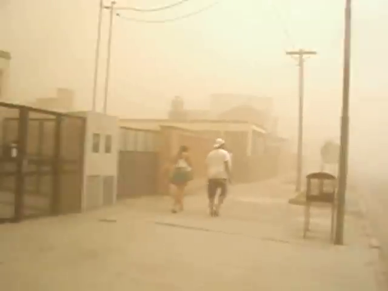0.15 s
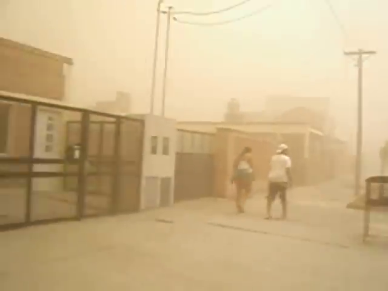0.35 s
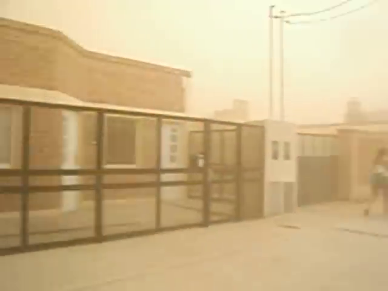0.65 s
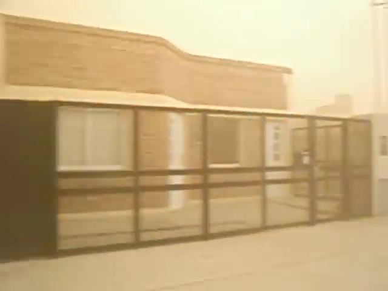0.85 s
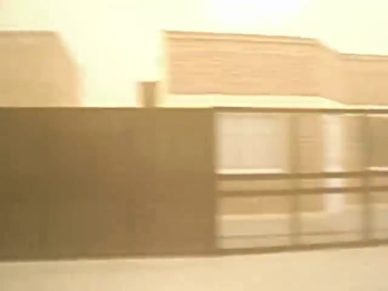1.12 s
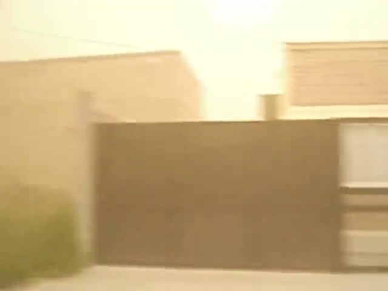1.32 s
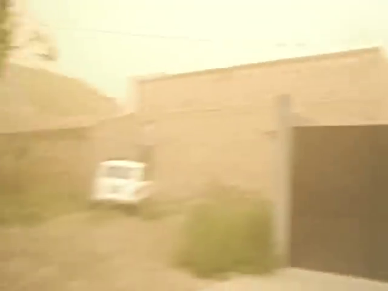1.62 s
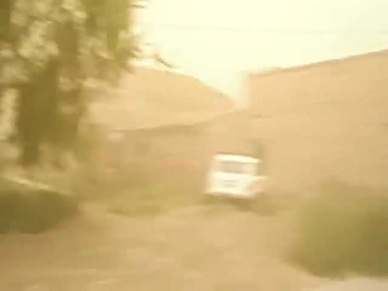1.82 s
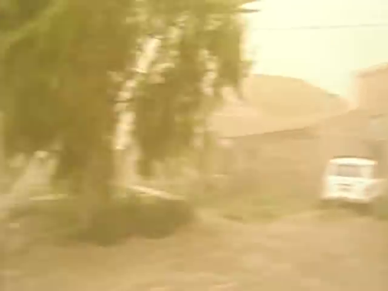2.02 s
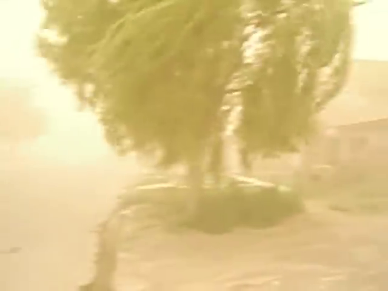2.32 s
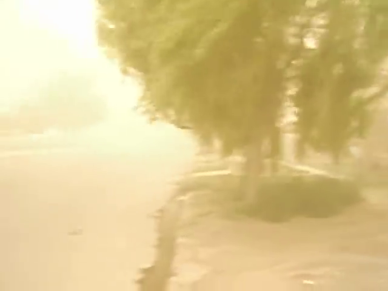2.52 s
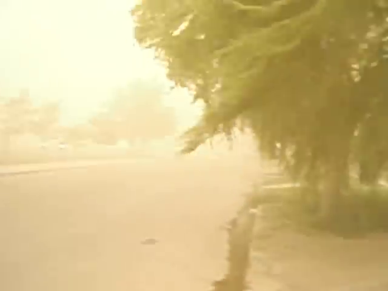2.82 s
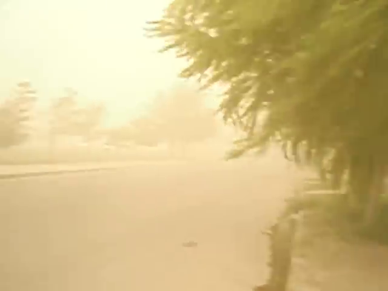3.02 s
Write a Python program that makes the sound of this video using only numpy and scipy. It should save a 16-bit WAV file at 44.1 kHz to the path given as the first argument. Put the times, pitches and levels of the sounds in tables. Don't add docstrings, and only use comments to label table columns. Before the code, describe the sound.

Gusty wind strikes a bare, cheap microphone in an open street. From 0.1 s irregular low thumps and flutters build to a heavy blow around 0.6 s, then weaken until a near-lull around 1.2-1.35 s. Harsh, clipping, ripping roar fills 1.4-1.8 s. Broken flutters follow, surging again at 2.2-2.8 s, then soft dull puffs over faint, steady wind hiss. Dull, narrow-band, mono.

```python
import sys
import numpy as np
from scipy import signal
from scipy.fft import rfft, irfft
from scipy.io import wavfile
from scipy.ndimage import uniform_filter1d

SR = 44100
rng = np.random.default_rng(int(sys.argv[2]) if len(sys.argv) > 2 else 0)


def output_pcm(signal):
    pcm = np.clip(np.atleast_2d(signal).T, -1, 1) * 32767
    wavfile.write(sys.argv[1], SR, np.round(pcm).astype(np.int16))


def gain_from_db(level_db):
    decades = np.asarray(level_db, float) / 20
    return 10 ** decades


N = 138915


def unit(x):
    return x / np.sqrt(np.mean(x ** 2))


def flicker(rate_hz):
    hold = int(SR / rate_hz)
    levels = rng.standard_normal(N)[:N // hold + 1]
    stairs = np.repeat(levels, hold)
    ramps = uniform_filter1d(uniform_filter1d(stairs, hold), hold)
    return unit(ramps[:N])


def pressure_band(centre_hz, width_hz):
    noise = rng.standard_normal(N)
    b, a = signal.iirpeak(centre_hz, centre_hz / width_hz, fs=SR)
    for _ in range(3):
        noise = signal.lfilter(b, a, noise)
    return unit(noise)


def buffeting(t):
    # t/s, level/dB
    steady_wind = [(0, -29.5), (0.101, -21.5), (0.299, -18), (0.601, -14.5), (.72, -19), (0.951, -21.5),
                   (1.149, -19.5), (1.302, -26), (1.385, -23.5), (1.411, -5), (1.799, -7), (1.839, -17.5),
                   (2.0, -20.5), (2.35, -19.5), (2.478, -4.5), (2.6, -16.5), (2.821, -24.5), (3.15, -27)]
    # f/Hz, width/Hz, level/dB, growth/(dB per dB of wind),
    # share of eddy sharpness/(dB per dB), flicker/dB, flicker rate/Hz
    port_bands = [
        (36.54, 50, -7, 0.79, -.3, 1, 16),
        (84.14, 110, -1, 0.93, -0.48, 1.5, 22),
        (189.7, 244, 0.5, 0.95, 0.36, 2.5, 27),
        (397.5, 439, -5, 1.18, 0.79, 2.5, 54),
        (782, 1037, -17, 1.016, 1.03, 5, 75),
        (2160, 2340, -34, 1.56, 0.75, 9, 140),
    ]
    eddy_power, sharpness_db = eddies(t)
    wind_t, wind_db = np.transpose(steady_wind)
    steady_power = gain_from_db(np.interp(t, wind_t, wind_db)) ** 2
    strength_db = 10 * np.log10(eddy_power + steady_power)
    strength_db = strength_db + 3 * flicker(30)

    total = np.zeros(N)
    for centre_hz, width_hz, level_db, growth, share, flicker_db, rate_hz in port_bands:
        band_db = level_db + growth * strength_db + share * sharpness_db
        band_db = band_db + flicker_db * flicker(rate_hz)
        total += gain_from_db(band_db) * pressure_band(centre_hz, width_hz)
    return total


def eddies(t):
    # start t/s, strength/dB, length/s, sharpness/dB
    striking = [(0.105, -7, 0.068, 2.5), (0.225, -1, 0.028, 6), (0.256, -4.5, 0.022, -2.5),
                (.352, -11, 0.018, 1), (0.411, -8.5, 0.044, -1), (0.484, -8.5, 0.018, -2),
                (.56, -5.5, 0.037, 1.5), (0.617, 1, 0.058, 0.5), (0.78, -7, .028, -4),
                (0.819, -9.5, 0.056, -3.5), (.879, -7.5, 0.026, 2.5), (1.047, -8.5, 0.0093, -6),
                (1.106, -9, 0.02, -1), (1.15, -9.5, 0.033, -3.5), (1.355, -10.5, 0.011, -8),
                (1.43, 1, 0.035, 4.5), (1.489, -1, 0.031, 5), (1.56, 3, 0.043, 5), (1.64, -11.5, 0.01, 6),
                (1.702, 3, .016, 6), (1.754, 1.5, 0.033, 4.5), (1.889, -7, 0.039, -3.5),
                (2.048, -5, 0.019, -8), (2.214, -4, .025, -0.5), (2.281, -1, 0.017, -4),
                (2.308, -1, .022, 1), (2.402, 2, 0.042, 2), (2.491, 0, .03, 2), (2.62, -3, 0.018, 2.5),
                (2.694, -5, 0.044, 1.5)]
    # start t/s, strength/dB, length/s, sharpness/dB
    sheltered = [
        (2.831, -15.5, .045, 0.5),
        (2.889, -16, 0.023, 0),
        (2.925, -15.5, 0.037, -3),
        (3.012, -14.5, 0.036, -1.5),
        (3.065, -14, 0.049, -1),
    ]
    # start t/s, strength/dB, sharpness/dB
    flicks = [(0.13, -4.5, -2.5), (.163, -10.5, 1.5), (1.812, 0, 5), (1.854, -8, 0.5), (1.933, -7, 4),
              (2.003, -8.5, 7.5), (2.1, -16, -1), (2.144, -11, 8), (2.173, -10, 4.5), (2.251, -6.5, -3.5),
              (2.57, -4.5, 6), (2.669, -2, -1), (2.765, -2, 0.5), (1.666, -1, 6.5), (1.72, 0, 6.5),
              (2.522, 2.5, 4), (2.793, -10.5, 2), (.66, 0, 0), (.376, -10.5, -0.5), (2.332, -4, 2),
              (1.385, -9, -2.5), (.525, -9, -0.5), (1.522, 1, 3.5), (0.18, -12, 2), (1.5, 1.5, 4),
              (1.467, 0.5, 5.5), (2.961, -11.5, 3.5), (1.261, -14.5, 2), (0.87, -22.5, 4.5)]
    flick_s, attack_s, gain_db = 0.013, 0.0036, -1

    strikes = list(striking) + list(sheltered)
    for start, strength_db, sharp_db in flicks:
        strikes.append((start, strength_db, flick_s, sharp_db))

    power, sharpness_db = np.zeros(N), np.zeros(N)
    for start, strength_db, length_s, sharp_db in strikes:
        age = t - start
        attack = np.clip(age / attack_s + 0.5, 0, 1)
        collapse = np.exp(-(np.maximum(age, 0) / length_s) ** 4)
        shape = attack * collapse
        power += (gain_from_db(strength_db + gain_db) * shape) ** 2
        sharpness_db += sharp_db * shape
    return power, sharpness_db


def distant_hiss(t):
    # f/Hz, level/dB
    hiss_colour = [(100, 1), (400, -1), (786, 1.5), (1500, -11), (1900, -4), (3200, -9.5), (4200, -10)]
    # t/s, level/dB
    hiss_fade = [
        (0, -31),
        (1.3, -31),
        (2.0, -33),
        (2.4, -34.5),
        (2.75, -34.5),
        (3.15, -37.5),
    ]
    freq = np.maximum(np.fft.rfftfreq(N, 1 / SR), 1)
    colour_hz, colour_db = np.transpose(hiss_colour)
    colour = gain_from_db(np.interp(np.log(freq), np.log(colour_hz), colour_db))
    colour = colour * np.minimum(freq / colour_hz[0], 1)
    noise = unit(irfft(rfft(rng.standard_normal(N)) * colour, N))
    fade_t, fade_db = np.transpose(hiss_fade)
    return noise * gain_from_db(np.interp(t, fade_t, fade_db) + 0.5 * flicker(7.8))


def scene():
    t = np.arange(N) / SR
    return (buffeting(t) + distant_hiss(t))[None]


def band_limit(x):
    return signal.sosfilt(signal.butter(12, 16990, fs=SR, output="sos"), x)


def record(dry):
    rail_top, rail_bottom, full_scale = 0.708, 0.69, 0.707
    up, down = 80, 441
    low_cut = signal.butter(2, 21.45, "high", fs=SR, output="sos")
    x = signal.sosfilt(low_cut, dry)

    slow = signal.resample_poly(x, up, down, axis=1, padtype="reflect")
    railed = np.clip(slow, -rail_bottom, rail_top)
    smooth = signal.firwin(32 * down + 1, 1 / down, window=("kaiser", 9.0))
    full = signal.resample_poly(railed, down, up, axis=1, window=smooth, padtype="reflect")
    full = np.clip(full[:, :N], -full_scale, full_scale)

    top_cut = signal.ellip(8, 0.05, 40, 15850, fs=SR, output="sos")
    finished = signal.sosfiltfilt(top_cut, full)
    return band_limit(finished)


dry = scene()
out = record(dry)
output_pcm(out)
```